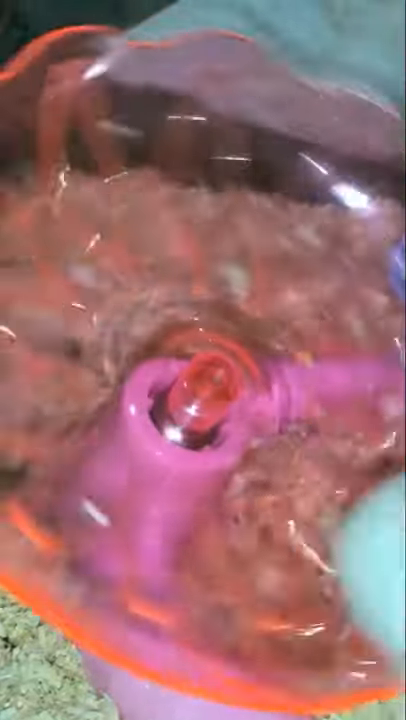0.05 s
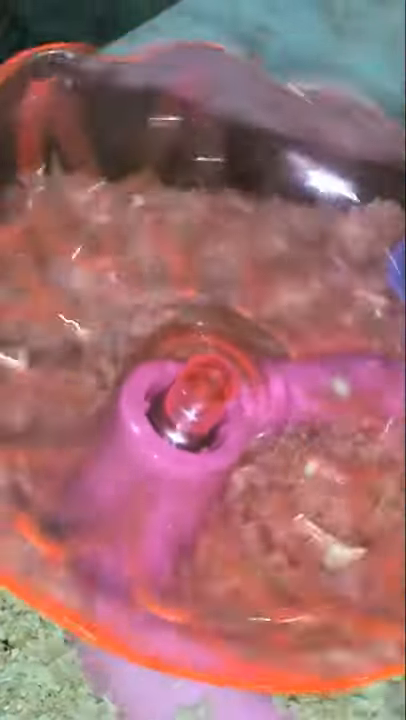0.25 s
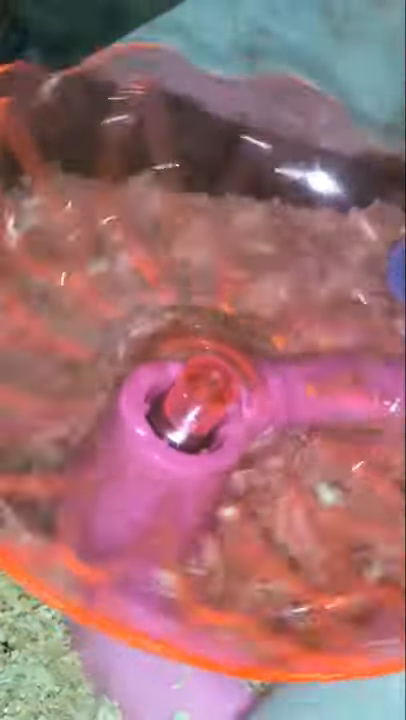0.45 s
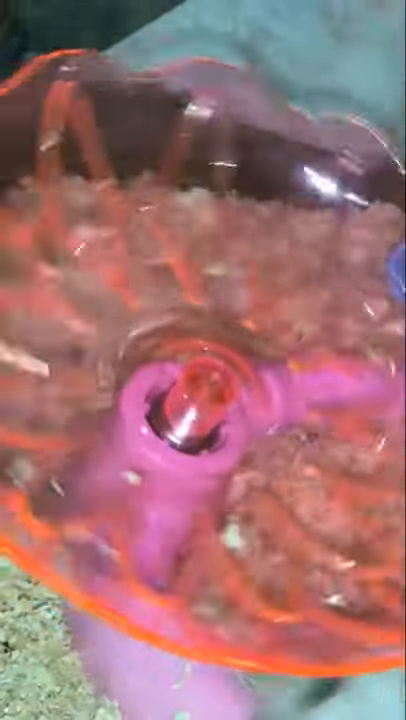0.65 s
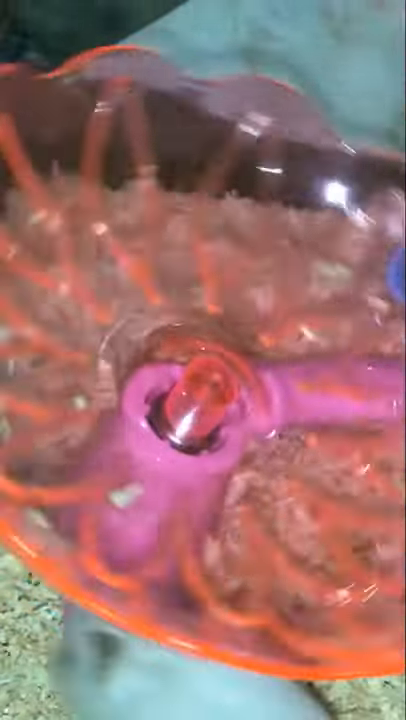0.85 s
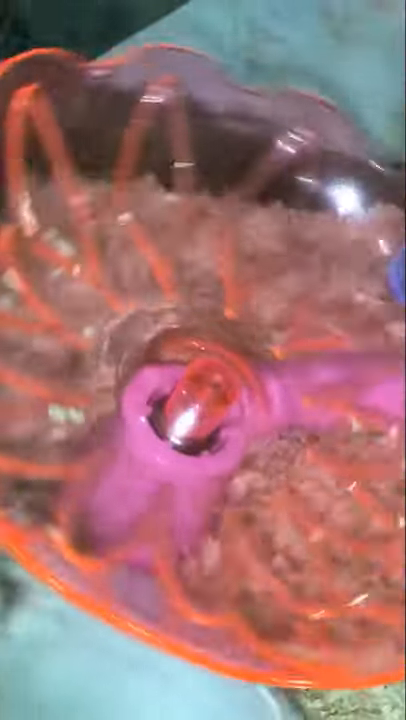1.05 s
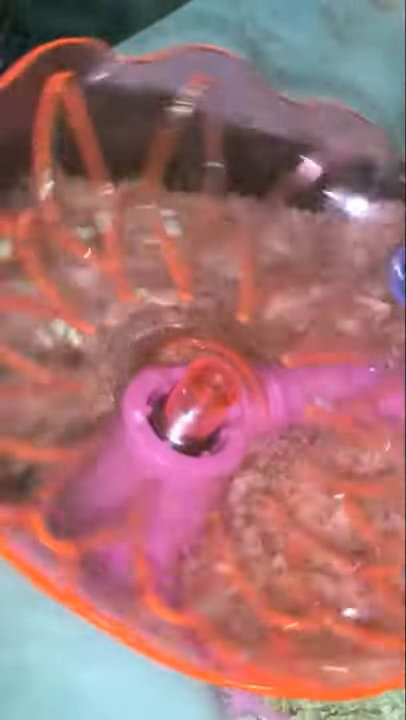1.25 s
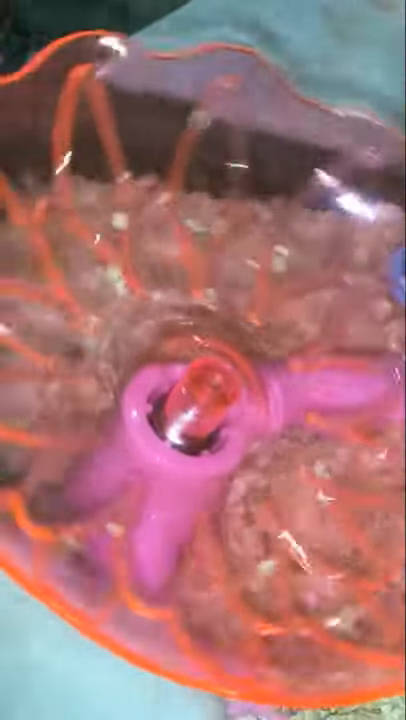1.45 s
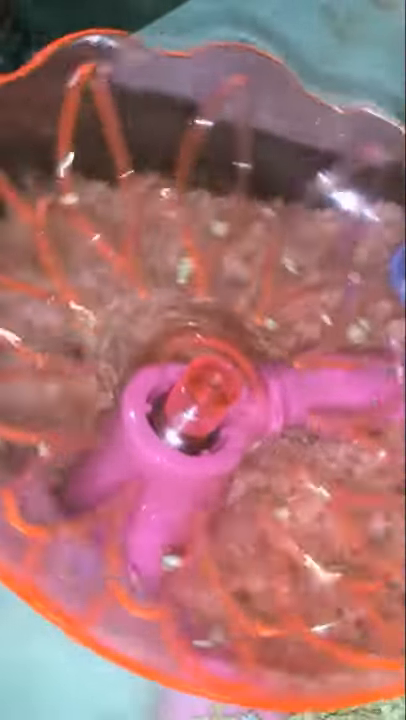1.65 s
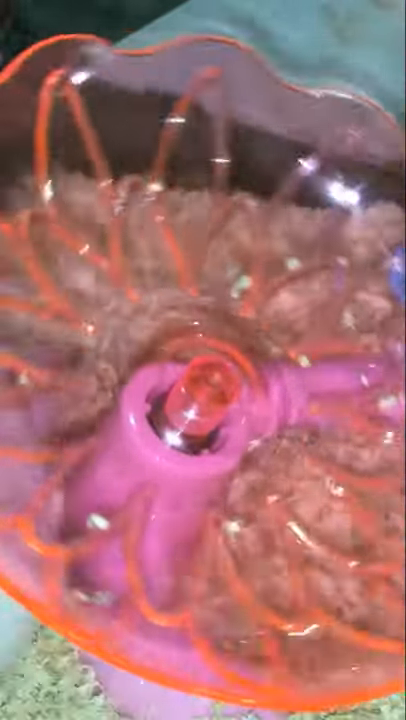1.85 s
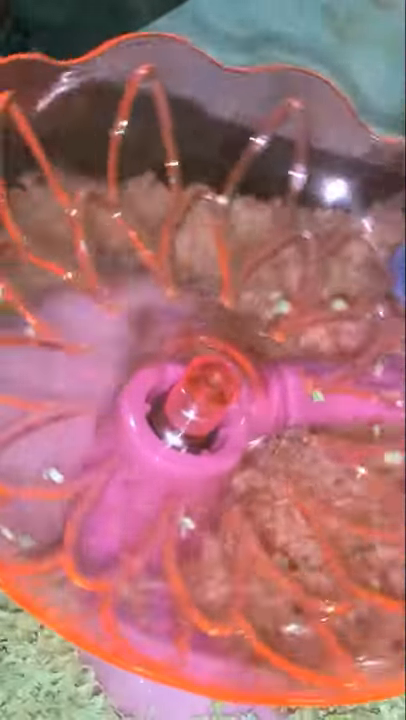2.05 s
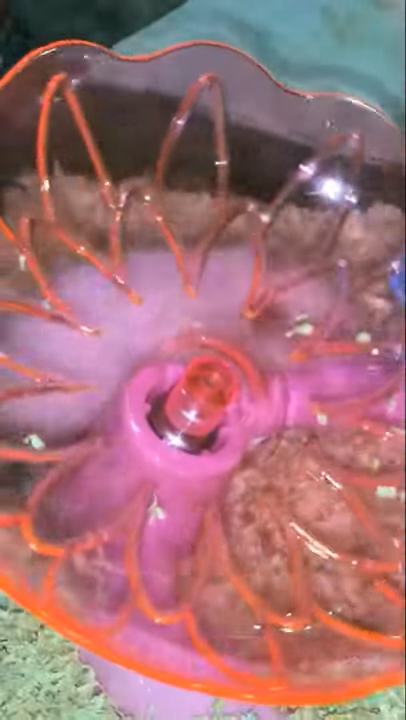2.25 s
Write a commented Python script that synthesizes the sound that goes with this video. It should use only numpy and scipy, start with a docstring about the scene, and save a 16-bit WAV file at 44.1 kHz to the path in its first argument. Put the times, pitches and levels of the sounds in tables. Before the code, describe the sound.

A plastic hamster wheel turns with a faint rumble and soft brushing, close to the microphone. At about 0.2 seconds one sharp knock, much louder than anything else, briefly rings the wheel, cage and small room, with a soft thud right behind it. From about 0.9 to 2.3 seconds, bedding crumbs tick lightly inside among faint rustles, while the rumble fades over a very low electrical hum.

```python
"""Small room, hand-held microphone close to a plastic hamster wheel coasting over bedding.
From the start the wheel rumbles on its axle and brushes softly now and then, over a faint mains hum.
At 0.2 s one sharp knock rings the wheel, its cage and the room; the wheel settles with a soft thud.
From about 0.9 s crumbs of bedding tick inside it, while the rumble fades as the wheel slows."""
import sys
import numpy as np
from scipy import signal
from scipy.fft import rfft, irfft, next_fast_len
from scipy.io import wavfile

SR = 44100
rng = np.random.default_rng(int(sys.argv[2]) if len(sys.argv) > 2 else 0)


def to_wav(s):
    """Save 16-bit WAV."""
    ch = np.atleast_2d(s).T  # columns
    pcm = np.round(np.clip(ch, -1, 1) * 32767)  # PCM
    wavfile.write(sys.argv[1], SR, pcm.astype(np.int16))


N = 101429
T = np.arange(N) / SR
FREQS = np.fft.rfftfreq(N, 1 / SR)

# room tone: f/Hz, relative density/dB
AIR_COLOUR = [(25, -36), (42, -1), (60, -0.5), (115, -5), (157, -4), (285, -8), (400, -13), (680, -13.5),
              (1200, -17), (1700, -22), (3160, -23.5), (4740, -28), (6560, -28), (9700, -30.5),
              (10400, -32), (12200, -27.5), (16000, -32.5)]
# mains hum: f/Hz, level/dB
MAINS_HUM = [(48.6, -66), (97.2, -70)]
# rumble of the hand on the microphone: t/s, level/dB
HANDLING_LEVEL = [(0, -59.5), (.18, -51), (.27, -56), (.39, -56), (.53, -62), (.6, -62), (.7, -64.5),
                  (2.3, -95)]
# its spectrum: f/Hz, relative density/dB
HANDLING_SPECTRUM = [(22, -55), (32, -21), (41, -1.5), (55, -16), (90, -13.5), (200, -49.5)]

# stand resonances driven by the axle: f/Hz, width/Hz, starting level/dB
AXLE_BANDS = [(142.8, 13.4, -59.5), (168, 27, -69), (197.5, 10, -65.5), (263, 14.5, -69),
              (295.5, 17.3, -68.5)]
# the stand's main resonance: f/Hz, width/Hz, relative level/dB
STAND_BAND = [(244.2, 15.7, 0)]
# resonances of the thin plastic: f/Hz, width/Hz, relative level/dB
PLASTIC_BANDS = [(2507, 112, 3.5), (3204, 134, 0.5), (3690, 220, -3.5), (4270, 430, -6.5), (5290, 200, -7),
                 (5810, 130, -5), (6350, 390, -6), (7060, 130, -4.5), (8500, 430, -9.5), (9630, 230, -8),
                 (12640, 270, -7.5), (11930, 720, -9.5), (13340, 360, -4), (14800, 580, -8.5),
                 (16300, 320, -13.5)]
# resonances of the hollow shell: f/Hz, width/Hz, relative level/dB
SHELL_BANDS = [(320, 54, -1.5), (442, 100, -0.5), (667, 115, 0.5), (983, 114, -1.5), (1207, 166, -1.5),
               (1600, 600, -8)]
# crumbs hitting the plastic: t/s, level/dB, tilt/(dB per octave)
CRUMB_TICKS = [(.9383, -60, 1), (.9738, -55.5, 1), (.9895, -58, 2), (0.9976, -54.5, 6), (1.6323, -66, 4),
               (1.7317, -55.5, 6.5), (1.736, -53.5, 2.5), (1.754, -61, 0), (1.9865, -55, 4),
               (2.0235, -59, -1), (2.0445, -59, 3), (2.062, -58.5, 0), (2.101, -57, 4), (2.112, -60, 4),
               (2.2753, -59.5, 7)]
# brushes of the wheel: middle t/s, half length/s, hiss/dB, hiss tilt/(dB per octave), shell/dB, drone/dB
BRUSHES = [(0.079, 0.042, -62.5, -1.5, -62.5, -52), (0.146, 0.019, -60.5, -.5, -69, -71),
           (0.203, 0.045, -60, 1, -57, -61), (0.319, 0.027, -63, 0, -68, -52),
           (0.45, 0.043, -64, -1, -61, -58), (0.549, 0.032, -75, -4, -71, -70.5),
           (0.65, 0.032, -74, 0, -68.5, -67), (0.697, 0.026, -66.5, -.5, -64.5, -73),
           (.78, 0.049, -73, -1.5, -67, -61), (0.971, 0.052, -68.5, 0, -69, -66.5),
           (1.124, .025, -70.5, 3.5, -73, -85), (1.191, 0.031, -65, 2, -68, -67),
           (1.232, .03, -73.5, 2, -64, -59.5), (1.29, 0.02, -69.5, 4, -73.5, -55.5),
           (1.544, 0.0048, -68.5, 0, -62.5, -61.5), (1.646, 0.036, -72.5, 0.5, -83, -70),
           (1.754, 0.018, -66, 0.5, -63.5, -63), (1.788, .02, -72, -2, -67.5, -74),
           (1.863, 0.01, -68.5, 2, -74, -83), (1.942, 0.011, -70, 3.5, -70, -83),
           (2.052, 0.026, -66, 0.5, -66, -72), (2.108, 0.015, -67.5, 2, -80, -66),
           (2.157, 0.05, -73.5, 0.5, -69, -66), (2.29, 0.047, -66.5, -.5, -64.5, -72)]

# the wheel's short-lived modes: f/Hz, level/dB, t60/s
WHEEL_RING = [(88.5, -59, 0.069), (229.7, -28.5, 0.16), (536, -42, 0.05), (708, -41.5, 0.3),
              (777.5, -30, 0.093), (843, -31, 0.059), (965, -22, 0.026), (1074, -40.5, 0.18),
              (1500, -45, 0.054), (1794, -39.5, 0.046), (2466, -55, 0.034), (2810, -48, 0.055),
              (3090, -39, 0.053), (3215, -32, 0.045), (3410, -49, 0.07), (4180, -41, 0.053),
              (4440, -39.5, 0.04), (5120, -43.5, 0.061), (5795, -46, .04), (6185, -44, 0.052),
              (9660, -48, .03), (13300, -39, 0.019)]
# the cage's lingering modes: f/Hz, level/dB, t60/s
CAGE_RING = [(142.1, -39.5, 0.38), (249.2, -29.5, 0.25), (316, -42, 0.47), (441.3, -52.5, 0.76),
             (513.5, -44.5, 0.47), (675, -42, 0.46), (707, -49, 0.36), (753, -46, 0.37), (942, -46, 0.43),
             (963, -49, 0.32), (1268, -49.5, 0.45), (1389, -48, .5), (1470, -44, 0.25), (1605, -52.5, 0.5),
             (2757, -61, 0.92), (3412, -59, 0.34)]
# crack of the contact: f/Hz, relative density/dB
CRACK_COLOUR = [(100, -43), (400, -6), (850, 2), (1200, -6.5), (2000, -8), (3250, -4), (5500, -15.5),
                (8500, -16.5), (11000, -24), (13200, -13.5), (16000, -17)]
# its decay: f/Hz, t60/s
CRACK_DECAY = [(500, 0.087), (3000, 0.058), (6500, 0.057), (13000, 0.037)]
# the room's answer to the knock: f/Hz, relative density/dB
ROOM_COLOUR = [(80, 0.5), (230, 0.5), (380, -5.5), (680, 0.5), (1000, -5), (1500, -7), (2000, -10.5),
               (3000, -11.5), (5000, -20.5), (9000, -31.5), (16000, -34)]
# its decay: f/Hz, t60/s
ROOM_DECAY = [(300, 0.62), (1200, 0.71), (3500, 0.59), (10000, 0.31)]

AIR_DB, SLOWING_DB_PER_S = -64, 6
SLIPS_PER_S, SLIP_SCATTER_DB = 1500, 2
KNOCK_S, CRACK_DB, ROOM_DB = .2152, -30, -40.5
REBOUND_S, REBOUND_DB = .249, -16
TOP_HZ = 16000


def undb(db):
    """Decibels to gain."""
    return 10 ** (np.asarray(db) / 20)


def unit(x):
    """Scale to an rms of 1."""
    return x / np.sqrt(np.mean(x ** 2))


def along(hz, points):
    """Read (f/Hz, value) points on a log-frequency axis."""
    freqs, values = np.array(points).T
    return np.interp(np.log(np.maximum(hz, 1)), np.log(freqs), values)


def coloured(colour):
    """Noise shaped by (f/Hz, density/dB) points; rms 1."""
    return unit(irfft(rfft(rng.standard_normal(N)) * undb(along(FREQS, colour)), N))


def resonate(x, bands):
    """Pass an excitation through (f/Hz, width/Hz, level/dB) resonances; rms 1."""
    freqs = np.maximum(FREQS, 1)
    power = sum(undb(db) ** 2 / (1 + ((freqs ** 2 - hz ** 2) / (freqs * width)) ** 2)
                for hz, width, db in bands)
    return unit(irfft(rfft(x) * np.sqrt(power), N))


def tilted(x, db_per_octave):
    """Brighten or dull a sound; rms 1."""
    size = next_fast_len(N, True)
    spectrum = rfft(x, size)
    octaves = np.log2(np.arange(1, len(spectrum) + 1))
    return unit(irfft(spectrum * undb(db_per_octave * octaves), size)[:N])


def strike(start, rise_s, t60_s):
    """Envelope of a quick swell and an exponential decay."""
    age = np.maximum(T - start, 0)
    return (1 - np.exp(-age / rise_s)) * np.exp(-np.log(1000) * age / t60_s)


def background():
    """Deep handling rumble on the microphone, mains hum and room tone."""
    handling = undb(np.interp(T, *np.array(HANDLING_LEVEL).T)) * coloured(HANDLING_SPECTRUM)
    hum = sum(undb(db) * unit(np.sin(2 * np.pi * (hz * T + rng.random()))) for hz, db in MAINS_HUM)
    return handling + hum + undb(AIR_DB) * coloured(AIR_COLOUR)


def axle():
    """The rough bearing drives the stand's low resonances, more weakly as the wheel slows."""
    rumble = np.zeros(N)
    for hz, width, db in AXLE_BANDS:
        band = rfft(rng.standard_normal(N)) / (1 + ((FREQS - hz) / width) ** 2)
        rumble += undb(db) * unit(irfft(band, N))
    return rumble * undb(-SLOWING_DB_PER_S * T)


def crumbs():
    """Light ticks of bedding falling inside the wheel, each with its own loudness and brightness."""
    plastic = resonate(rng.standard_normal(N), PLASTIC_BANDS)
    return sum(undb(db) * strike(start, rise_s=.0012, t60_s=.035) * tilted(plastic, tilt)
               for start, db, tilt in CRUMB_TICKS)


def friction():
    """A dense train of tiny slips of uneven size."""
    slips = (rng.random(N) < SLIPS_PER_S / SR) * rng.choice([-1, 1], N)
    return slips * undb(SLIP_SCATTER_DB * rng.standard_normal(N))


def brushes():
    """Each brush swells and fades: a grainy hiss of plastic, the hollow shell and a drone in the stand."""
    hiss = resonate(friction(), PLASTIC_BANDS)
    shell = resonate(resonate(friction(), SHELL_BANDS), SHELL_BANDS)  # two passes sharpen the peaks
    drone = resonate(resonate(friction(), STAND_BAND), STAND_BAND)
    sound = np.zeros(N)
    for middle, half_length, hiss_db, tilt, shell_db, drone_db in BRUSHES:
        swell = np.exp(-((T - middle) / half_length) ** 2)
        rub = undb(hiss_db) * tilted(hiss, tilt) + undb(shell_db) * shell + undb(drone_db) * drone
        sound += swell * rub
    return sound


def ring(modes, start, soft_hz=np.inf):
    """Struck modes swell over about a cycle and decay; a soft contact spares those above soft_hz."""
    sound = np.zeros(N)
    for hz, db, t60 in modes:
        gain = undb(db) / (1 + (hz / soft_hz) ** 2)
        sound += gain * strike(start, 1 / hz, t60) * np.sin(2 * np.pi * hz * (T - start))
    return sound


def wash(colour, decay, rise_s):
    """Countless overlapping resonances set off by the knock; each octave dies at its own rate."""
    spectrum = rfft(coloured(colour))
    octaves_hz = 125 * 2. ** np.arange(8)
    sound = np.zeros(N)
    for hz, share in zip(octaves_hz, np.eye(len(octaves_hz))):
        band = irfft(spectrum * along(FREQS, list(zip(octaves_hz, share))), N)
        sound += band * strike(KNOCK_S, rise_s, along(hz, decay))
    return sound


def knock():
    """Close up, a hard crack rings wheel and cage; the wheel settles back softly and the room answers."""
    crack = undb(CRACK_DB) * wash(CRACK_COLOUR, CRACK_DECAY, rise_s=.0012)
    ringing = ring(WHEEL_RING + CAGE_RING, KNOCK_S)
    rebound = undb(REBOUND_DB) * ring(WHEEL_RING, REBOUND_S, soft_hz=500)
    room = undb(ROOM_DB) * wash(ROOM_COLOUR, ROOM_DECAY, rise_s=.012)
    return crack + ringing + rebound + room


def scene():
    """Everything at the one microphone beside the wheel."""
    return (knock() + brushes() + crumbs() + axle() + background())[None]


def record(dry):
    """The recorder cuts the treble steeply above TOP_HZ."""
    return signal.sosfilt(signal.ellip(10, .2, 70, TOP_HZ, fs=SR, output="sos"), dry)


dry = scene()
out = record(dry)
to_wav(out)
```